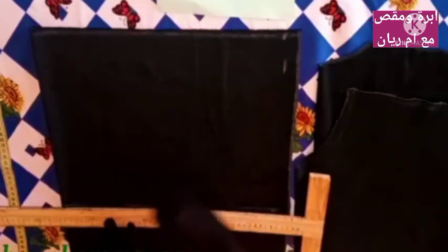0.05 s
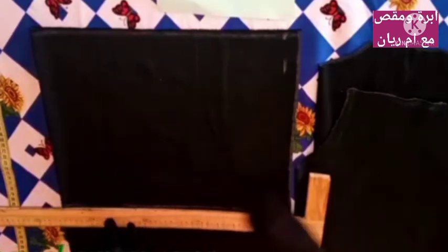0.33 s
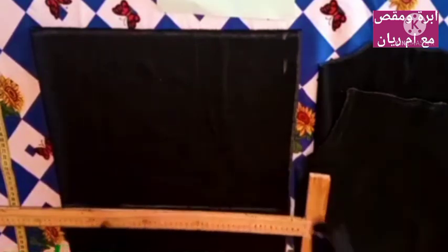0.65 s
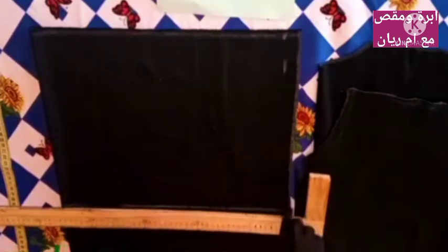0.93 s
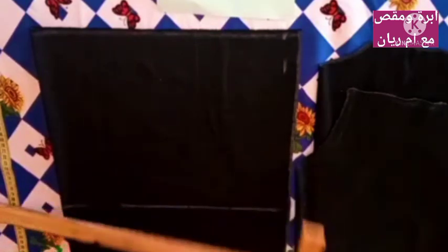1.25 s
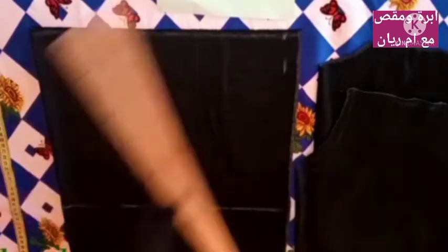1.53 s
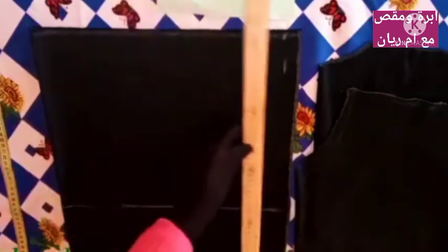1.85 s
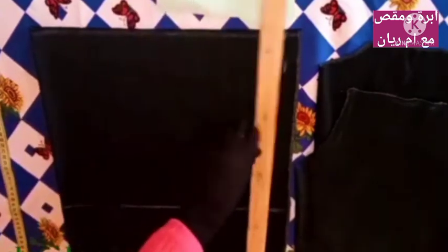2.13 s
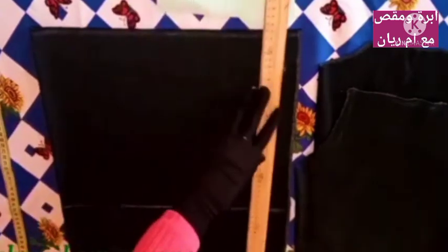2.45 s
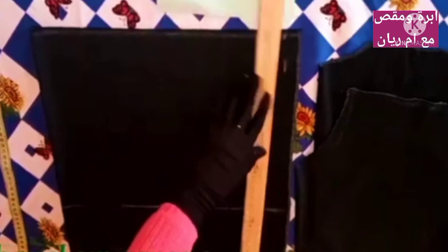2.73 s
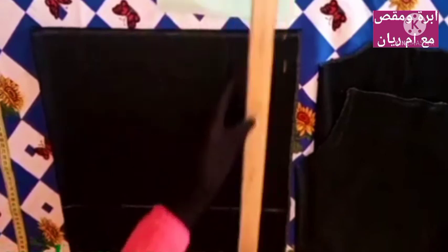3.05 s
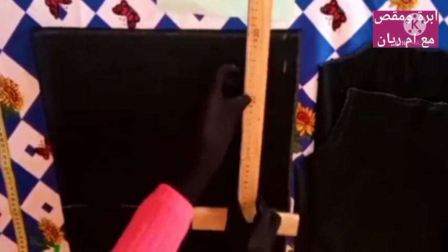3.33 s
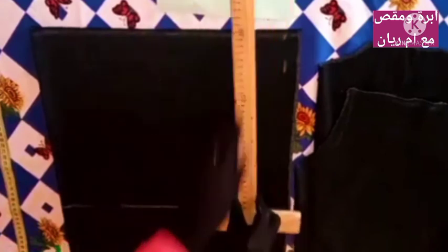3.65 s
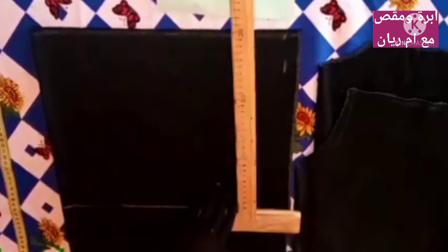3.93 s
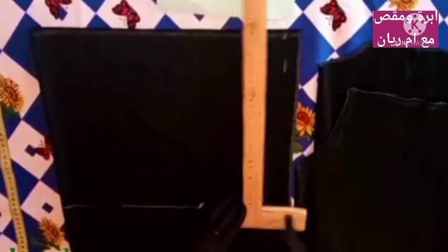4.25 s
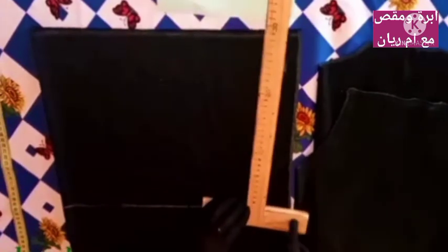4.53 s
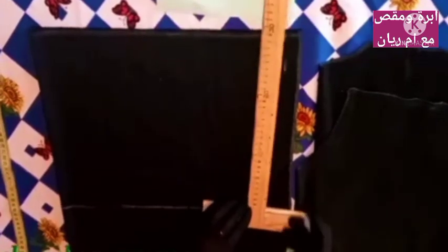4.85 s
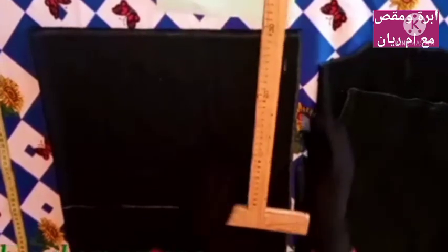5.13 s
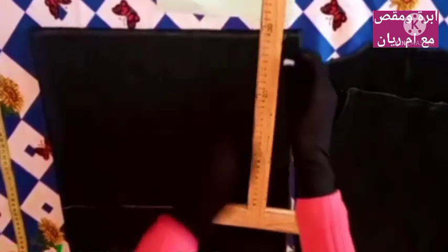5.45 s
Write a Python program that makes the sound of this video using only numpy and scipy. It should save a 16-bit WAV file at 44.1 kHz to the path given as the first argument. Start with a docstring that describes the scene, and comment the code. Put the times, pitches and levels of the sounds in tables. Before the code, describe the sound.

Chalk judders over cloth on a booming table, then a wooden square is turned, clacks down loudly and scrapes into place.

```python
"""First, tailor's chalk judders along a wooden square over cloth, and the table booms under it.
Then the square is lifted and turned, with soft bumps, swishes of cloth and a few wooden clacks.
At 3.7 s it is set down with the loudest clack; a limiter ducks the sound and slowly lets it back up.
Last, the square is pushed into place in four short, scraping strokes.
All along, a small hard room rings after the sounds and adds a faint rumble and hiss."""
import sys
import numpy as np
from scipy import signal
from scipy.fft import rfft, irfft
from scipy.io import wavfile
from scipy.ndimage import uniform_filter1d, minimum_filter1d

SR = 44100
rng = np.random.default_rng(int(sys.argv[2]) if len(sys.argv) > 2 else 0)


def master_out(mix):
    """Clip the mix to full scale and print it as 16-bit PCM to the path in sys.argv[1]."""
    frames = np.transpose(np.atleast_2d(mix))
    ceiling = np.clip(frames, -1, 1)
    pcm = np.round(ceiling * 32767).astype(np.int16)
    wavfile.write(sys.argv[1], SR, pcm)


N = 250776
TIME = np.arange(N) / SR
HZ = np.fft.rfftfreq(N, 1 / SR) + 1
FILTER_HZ = abs(np.fft.fftfreq(4096, 1 / SR)) + 1

# How long the room rings. Each row: frequency in Hz, seconds to fade by 60 dB.
ROOM_FADE = [(150, 0.36), (500, 0.65), (1000, 0.4), (2200, 0.44), (4000, 0.32), (7000, 0.27), (14000, 0.21)]
# First echoes off table and wall. Each row: delay in seconds, level in dB.
EARLY_ECHOES = [(.0011, -23.5), (.0026, -23), (.0043, -38.5), (.0068, -17.5), (0.0124, -17)]
# The tone of the room's rumble. Each row: frequency in Hz, relative level in dB.
RUMBLE_TONE = [(15, -59.5), (25, -41), (27, -33.5), (32, -18.5), (97, -0.5), (151, 7.5), (195, -10.5),
               (377, -13.5), (400, -30), (520, -66), (880, -120)]
# The tone of the steady hiss. Each row: frequency in Hz, relative level in dB.
HISS_TONE = [(120, -41), (200, -4.5), (725, -13), (1910, -11), (2160, -12), (2800, -12), (4120, -18.5),
             (7040, -20.5), (7840, -25.5), (8270, -23), (9710, -28), (13400, -27.5), (14400, -23)]
# Soft, dull low thumps during the handling and under the loudest clack.
# Each row: peak time in seconds, level in dB.
LOW_SWELLS = [(1.31, -39.5), (1.668, -45.5), (1.82, -46.5), (1.9, -49.5), (2.06, -49.5), (3.63, -51),
              (3.735, -37), (4.08, -53.5), (4.37, -36), (4.54, -45.5), (5.621, -45)]
# Glove and wood brush the cloth. Each row: fastest moment, time to speed up and time to slow down
# in seconds, relative level in dB, share of power above 7 kHz.
BRUSH_STROKES = [(.72, 0.045, .05, -53.5, 0.88), (0.761, .02, 0.022, -47.5, .1),
                 (.945, 0.29, 0.12, -55.5, 0.62), (1.128, 0.047, 0.032, -42.5, 0.62),
                 (1.3, 0.16, 0.093, -43, 0.37), (1.582, 0.028, 0.044, -54.5, 0.7),
                 (1.88, 0.25, 0.12, -56.5, 0.027), (2.135, 0.17, 0.041, -59, 0.25),
                 (2.29, 0.14, 0.094, -38.5, 0.38), (2.63, 0.088, 0.088, -50.5, 0.12),
                 (2.91, 0.065, 0.034, -34, 0.37), (3.041, 0.007, 0.085, -44.5, 0.78),
                 (3.096, 0.07, 0.028, -46.5, 0.42), (3.174, .035, 0.025, -48.5, 1),
                 (3.283, 0.028, 0.009, -42, 0.077), (3.712, 0.022, 0.026, -36.5, 0.21),
                 (4.12, 0.12, 0.13, -54.5, 0.62), (5.03, 0.096, 0.15, -51, 1),
                 (5.669, 0.024, 0.088, -46, 0.69)]
# The tone of brushed cloth. Each row: frequency in Hz, relative level in dB.
CLOTH_TONE = [(880, -56), (1500, -33), (2810, -17), (3030, -26.5), (3540, -3.5), (5450, -9), (6010, -1),
              (6680, -9), (7350, 1), (9450, -12.5), (11300, -3.5), (15000, -26)]
# Chalk or wood snags the weave. Each row: start and length in seconds, level in dB,
# centre and width of the noise band in Hz.
SNAGS = [(0.229, 0.25, -47, 4150, 260), (1.09, 0.094, -51, 2600, 2600), (1.186, 0.21, -54.5, 4080, 500),
         (2.534, 0.15, -59.5, 7950, 403), (2.888, .019, -33.5, 6040, 2220), (2.906, 0.012, -29, 5840, 2270),
         (2.956, .022, -50, 5950, 500), (3.068, 0.043, -41, 6000, 1900), (3.702, 0.021, -45, 2500, 1200),
         (4.463, 0.01, -35, 4220, 894), (4.568, 0.055, -27.5, 2840, 1280)]
# Wood bumps the covered table. Each row: start in seconds, noise level in dB, low and high edge in Hz,
# pitch of the strongest note in Hz, its level in dB.
BUMPS = [(0.563, -30.5, 324, 860, 580, -42), (0.943, -55, 200, 300, 226, -46),
         (1.124, -35.5, 272, 580, 323, -34), (2.148, -29.5, 278, 814, 341, -29),
         (2.153, -34, 55, 198, 95.5, -35), (2.194, -34, 70, 710, 89, -31.5),
         (3.287, -35.5, 297.6, 850, 1087, -31), (3.736, -14.5, 305, 1080, 323.5, -28.5),
         (4.342, -29.5, 120, 600, 350, -52)]
# The notes the square rings at. Each row: pitch in Hz, width in Hz before damping, relative level in dB.
SQUARE_NOTES = [(653, 94, -4), (728.8, 36, 2), (994.3, 42, 1.5), (1083, 27, -17.5), (1338, 32, 3),
                (1504, 45, -2.5), (1633, 87, -8), (1760, 78, -2), (1913, 60, -3.5), (2095, 52, -1),
                (2315, 61, -7), (2610, 13, -9.5), (2755, 30, -3), (3133, 68, -1.5), (3670, 61, -16.5),
                (3960, 40, -10), (4130, 180, -14.5), (4400, 110, -3.5), (4550, 300, -9.5), (5340, 55, -9),
                (5360, 35, -18), (5720, 240, -5), (6800, 76, -10.5), (7510, 80, -5)]
# The square slides. Each row: fastest moment, time to speed up and time to slow down in seconds,
# hiss level in dB, wood tone level in dB.
PUSH_STROKES = [(4.341, 0.074, 0.079, -27.5, -35.5), (4.6, 0.19, 0.06, -24, -26.5),
                (4.845, 0.034, 0.065, -35.5, -37), (5.562, .04, 0.087, -41.5, -53)]
# The tone of the sliding square. Each row: frequency in Hz, relative level in dB.
SCRAPE_TONE = [(240, -47), (400, -34), (718, -7.5), (834, -43), (983, -10), (1160, -41.5), (1350, -16),
               (1540, -5.5), (2610, 5), (2850, -3), (3570, 6.5), (5120, -1.5), (7010, 2.5), (14400, -15.5)]
# The square knocks. Each row: start in seconds, strength in dB, low and high edge in Hz, treble fall
# in dB per octave, wood ring in dB, damping by the hand as a factor, room level in dB.
CLACKS = [(2.1453, 3, 3460, 7300, 13, -10.5, 0.52, -8.5), (2.1897, -.5, 3460, 7460, 8, -8.5, 0.4, -5.5),
          (3.2272, -16, 6700, 7850, 7, -27, 1.5, -6), (3.2866, 8.5, 910, 1294, 5.5, 0.5, 1.1, -3),
          (3.735, 34, 1940, 2440, 12, 0.5, 1.07, -3), (3.7368, 25.5, 5400, 6200, 32, -8.5, 0.57, -22.5),
          (4.3338, 11.5, 830, 1610, 18.5, -3.5, 0.55, -0.5), (4.604, 5, 810, 1400, 24.5, -4, 0.13, -4.5),
          (4.835, -5, 754, 1370, 5.5, -3.5, 0.28, 1), (5.553, -10, 790, 1470, 27, 20, 0.13, -7)]
# The microphone's colouring of the clacks, with dips in the high treble.
# Each row: frequency in Hz, relative level in dB.
MIC_TONE = [(100, -13.5), (7500, 1), (9700, -6.5), (11500, -4), (13500, -21), (15000, -9.5)]
# The notes the table booms at. Each row: pitch in Hz, relative level in dB, seconds to fade by 60 dB.
TABLE_NOTES = [(57.6, -24, 0.49), (94.4, -39, 0.16), (145, -9, 0.078), (147.3, -5.5, 0.32),
               (164.7, -9, 0.37), (240, -0.5, 0.026), (285, -18.5, 0.39), (314.7, -10, 0.14),
               (410, -37, 0.36), (542, -14.5, 0.087), (744, -26, 0.42)]
# The tone of dragging chalk. Each row: frequency in Hz, relative level in dB.
CHALK_TONE = [(120, -36), (200, 7.5), (320, 1), (435, -4), (671, -9.5), (748, -6.5), (1170, -8), (2020, -9),
              (3870, -17), (7420, -16.5), (8500, -19.5), (9550, -30.5), (11500, -21.5), (12600, -35),
              (15000, -34)]
# The chalk catches and jumps. Each row: start in seconds, strength in dB.
CHALK_CATCHES = [(.010, -11.5), (.073, -13.5), (0.093, -17), (0.137, -8.5), (.184, -11.5), (.237, -10.5),
                 (.311, -12.5), (.379, -12), (.454, -11), (0.56, -13.5)]


def amp(db):
    """Turns decibels into a gain."""
    return 10 ** (np.asarray(db) / 20)


def unit(x):
    """Scales a sound to an average (rms) level of 1."""
    return x / np.sqrt(np.mean(x ** 2) + 1e-20)


def read(points, hz):
    """Reads between a table's rows, with frequency spaced in octaves."""
    f, value = np.transpose(points)
    return np.interp(np.log(hz + 1), np.log(f + 1), value)


def add(mix, s, sound):
    """Mixes a sound in at s seconds."""
    part = mix[max(round(s * SR), 0):][:len(sound)]
    part += sound[:len(part)]


def colour(x, gain):
    """Shapes the tone with a gain for each of HZ; the result has level 1."""
    return unit(irfft(rfft(x) * gain, N))


def causal(x, db):
    """Shapes the tone by dB given on FILTER_HZ, with no ringing ahead of a hit (minimum phase)."""
    log_gain = np.log(amp(db) + 1e-5)
    taps = np.fft.ifft(np.exp(np.conj(signal.hilbert(log_gain)))).real
    return signal.fftconvolve(x, taps[:len(taps) // 2])[:len(x)]


def band(x, low_hz, high_hz, fall_db, rise_db=15):
    """Keeps a band of frequencies; its sides rise and fall by the given dB per octave."""
    octaves_below = np.log2(1 + (low_hz / FILTER_HZ) ** 6) / 6
    octaves_above = np.log2(1 + (FILTER_HZ / high_hz) ** 4) / 4
    return causal(x, -rise_db * octaves_below - fall_db * octaves_above)


def waver(rate_hz, depth_db):
    """A gain that wanders at random."""
    return amp(depth_db * colour(rng.standard_normal(N), 1 / (1 + (HZ / rate_hz) ** 4)))


def stroke(peak_s, rise_s, fall_s, roundness=1.):
    """Gain of one swell: a tenth of its peak rise_s before and fall_s after it."""
    away = np.maximum((peak_s - TIME) / rise_s, (TIME - peak_s) / fall_s)
    return amp(-20 * np.minimum(abs(away), 10) ** roundness)


def held(db, recover_db_per_s):
    """Follows each peak at once and lets go at a steady rate."""
    fall = TIME * recover_db_per_s
    return np.maximum.accumulate(db + fall) - fall


def reflect(x):
    """Nearby surfaces repeat the sound within milliseconds, which colours it."""
    out = x.copy()
    for delay_s, db in EARLY_ECHOES:
        add(out, delay_s, amp(db) * x)
    return out / np.sqrt(1 + np.sum(amp(np.array(EARLY_ECHOES)[:, 1]) ** 2))


def room(x, build_s=0.0055):
    """Countless echoes build up quickly; each frequency dies away at its own speed."""
    hz, t, spectrum = signal.stft(rng.standard_normal(SR), SR, nperseg=256)
    fade = amp(-60 * t / read(ROOM_FADE, hz)[:, None])
    tail = signal.istft(spectrum * fade, SR, nperseg=256)[1]
    tail *= 1 - np.exp(-TIME[:len(tail)] / build_s)
    return signal.fftconvolve(x, tail / np.linalg.norm(tail))[:N]


def background(rumble_db=-58.5, hiss_db=-57):
    """An uneven low rumble and a faint hiss, with a soft, dull thump now and then."""
    swells = sum(amp(db) * stroke(s, rise_s=0.037, fall_s=0.14) for s, db in LOW_SWELLS)
    hum = unit(band(rng.standard_normal(N), low_hz=122, high_hz=170, fall_db=22, rise_db=22.5))
    drift = waver(rate_hz=7, depth_db=3.5)
    rumble = colour(rng.standard_normal(N), amp(read(RUMBLE_TONE, HZ)))
    hiss = colour(rng.standard_normal(N), amp(read(HISS_TONE, HZ)))
    return swells * hum + amp(rumble_db) * drift * rumble + amp(hiss_db) * hiss


def fibres(per_s, spread_db, smooth):
    """Friction: threads snap free in tiny slips of uneven size over a smooth rub."""
    slips = (rng.random(N) < per_s / SR) * rng.choice([-1, 1], N)
    sizes = amp(spread_db * np.minimum(rng.exponential(1, N), 4))
    return unit(unit(slips * sizes) + smooth * rng.standard_normal(N))


def wood(x, damping):
    """The square rings at its own notes; a hand on it damps them, so they die sooner."""
    t = TIME[:SR // 2]
    ring = np.zeros(len(t))
    for k, (hz, width, db) in enumerate(SQUARE_NOTES):
        fade = np.exp(-np.pi * width * damping * t)
        ring += (-1) ** k * amp(db) * width * fade * np.cos(2 * np.pi * hz * t)
    return signal.fftconvolve(x, ring / np.linalg.norm(ring))[:len(x)]


def brushes(level_db=-1.0, ring_db=1, room_db=-10):
    """Light strokes over the weave, coloured by the wood: a soft rub and a finer fizz."""
    slips = fibres(per_s=1800, spread_db=3, smooth=.6) * waver(rate_hz=80, depth_db=1.0)
    slips = reflect(slips + amp(ring_db) * wood(slips, damping=2.2))
    weave = amp(read(CLOTH_TONE, HZ))
    highs = 1 / (1 + (7000 / HZ) ** 8)
    rub, fizz = colour(slips, weave * (1 - highs)), colour(slips, weave * highs)
    out = np.zeros(N)
    for s, rise_s, fall_s, db, treble in BRUSH_STROKES:
        swish = np.sqrt(1 - treble) * rub + np.sqrt(treble) * fizz
        out += amp(db + level_db) * stroke(s, rise_s, fall_s, roundness=1.09) * swish
    return out + amp(room_db) * room(out)


def rasps(depth=0.14, room_db=-8):
    """Quick sticking and slipping makes a narrow band of rubbing noise flutter."""
    out = np.zeros(N)
    for s, length_s, db, centre_hz, width_hz in SNAGS:
        t = TIME[:round(length_s * SR)]
        band_db = -10 * np.log10(1 + (2 * (FILTER_HZ - centre_hz) / width_hz) ** 4)
        grit = causal(rng.standard_normal(len(t)), band_db)
        slip_hz = rng.uniform(48.3, 97.65)
        flutter = 1 + depth * np.cos(2 * np.pi * (slip_hz * t + rng.random()))
        add(out, s, amp(db) * unit(grit * flutter * signal.windows.tukey(len(t), .5)))
    return out + amp(room_db) * room(out)


def thuds(rise_s=0.0079, fade_s=0.42):
    """Cloth pads these blows, leaving one strong note in a dull rush of weaker ones."""
    out, t = np.zeros(N), TIME[:SR]
    for s, db, low_hz, high_hz, note_hz, note_db in BUMPS:
        rush = unit(band(reflect(rng.standard_normal(len(t))), low_hz, high_hz, fall_db=16))
        body = amp(db) * rush + amp(note_db) * np.sin(2 * np.pi * note_hz * t)
        add(out, s, body * amp(-60 * t / fade_s) * (1 - np.exp(-t / rise_s)))
    return out


def pushes(roundness=1.74, sing_s=0.18, ring_db=0.5, drone_db=-18, room_db=-9):
    """The sliding square hisses with speed and drones on the table; its low notes sing and linger."""
    speed, singing = np.zeros(N), np.zeros(N)
    for s, rise_s, fall_s, hiss_db, tone_db in PUSH_STROKES:
        speed += amp(hiss_db) * stroke(s, rise_s, fall_s, roundness)
        singing += amp(tone_db) * stroke(s, min(rise_s, sing_s), sing_s, roundness)
    slips = fibres(per_s=1600, spread_db=0.5, smooth=0.41) * waver(rate_hz=65, depth_db=2.0)
    rub = reflect(slips) + amp(ring_db) * wood(slips, damping=1.)
    drone = unit(band(slips, low_hz=180, high_hz=360, fall_db=14, rise_db=17))
    scrape = speed * (colour(rub, amp(read(SCRAPE_TONE, HZ))) + amp(drone_db) * drone)
    song = band(wood(slips, damping=0.44), low_hz=970, high_hz=1440, fall_db=15, rise_db=12.5)
    return scrape + singing * unit(song) + amp(room_db) * room(scrape)


def knocks(chatter=0.25, contact_cycles=5):
    """A sharp hit with a brief chatter rings the square and the room; duller hits chatter longer."""
    t, near, far = TIME[:SR // 2], np.zeros(N), np.zeros(N)
    for s, db, low_hz, high_hz, fall_db, ring_db, damping, room_db in CLACKS:
        force = chatter * rng.standard_normal(len(t)) * np.exp(-t * high_hz / contact_cycles)
        force[0] = 2  # the hit itself
        clack = band(force + amp(ring_db) * wood(force, damping), low_hz, high_hz, fall_db)
        clack = causal(clack, read(MIC_TONE, FILTER_HZ))
        clack *= amp(db) / np.linalg.norm(clack)
        add(near, s, clack)
        add(far, s, amp(room_db) * clack)
    return reflect(near) + room(far)


def chalk_stroke(attack_s=0.0083, ease_at_s=0.22, ease_db_per_s=15, lift_at_s=0.564, lift_db_per_s=189):
    """Gain of the chalk's drag: it starts quickly, eases off and dies as the chalk is lifted."""
    eased_db = ease_db_per_s * np.maximum(TIME - ease_at_s, 0)
    lifted_db = lift_db_per_s * np.maximum(TIME - lift_at_s, 0)
    return np.minimum(TIME / attack_s, 1) * amp(-eased_db - lifted_db) * waver(rate_hz=21, depth_db=1.5)


def chalk(rub_db=-27, scratch_db=-9.5, scratch_s=0.0071, bite_s=.28,
          rise_s=0.0024, tremble_db=-29, room_db=-8):
    """The chalk drags and catches; each catch scratches and sets the table booming."""
    t = TIME[:SR // 2]
    boom = sum(amp(db - 60 * t / fade_s) * np.sin(2 * np.pi * hz * t) for hz, db, fade_s in TABLE_NOTES)
    boom *= 1 - np.exp(-t / rise_s)  # the cloth softens the blow
    blows, catches = np.zeros(N), np.zeros(N)
    for s, db in CHALK_CATCHES:
        add(blows, s, amp(db) * boom)
        bite = min(s / bite_s, 1)  # scratches grow as the chalk bites into the cloth
        add(catches, s, amp(db + scratch_db) * bite * np.exp(-t / scratch_s))
    drag = chalk_stroke()
    slips = fibres(per_s=3200, spread_db=-0.5, smooth=0.92)
    rub = colour(reflect(slips), amp(read(CHALK_TONE, HZ)))
    scratch = catches * unit(band(rng.standard_normal(N), low_hz=300, high_hz=3080, fall_db=20))
    # the drag also keeps the table trembling between catches
    tremble = unit(signal.fftconvolve(rng.standard_normal(N), boom)[:N]) * drag
    table = band(blows + amp(tremble_db) * tremble, low_hz=48.6, high_hz=2960, fall_db=29)
    return table + amp(rub_db) * drag * rub + scratch + amp(room_db) * room(scratch)


def scene():
    """Everything on the table and the room around it, mixed to one channel."""
    return (chalk() + knocks() + thuds() + pushes() + brushes() + rasps() + background())[None]


def record(dry, ceiling_db=-1, quick_db_per_s=200, linger_db=7.0, slow_db_per_s=2.0, top_hz=15250):
    """A limiter turns peaks down and recovers fast, then slowly; the highest treble is cut off."""
    over_db = np.maximum(20 * np.log10(abs(dry[0]) + 1e-9) - ceiling_db, 0)
    quick_cut_db = held(over_db, quick_db_per_s)
    slow_cut_db = held(np.minimum(over_db, linger_db), slow_db_per_s)
    gain_db = -np.maximum(quick_cut_db, slow_cut_db)
    smooth_db = uniform_filter1d(minimum_filter1d(gain_db, size=41), size=41)
    low_pass = signal.firwin(511, top_hz, window=("kaiser", 9), fs=SR)
    return signal.oaconvolve(dry * amp(smooth_db), low_pass[None], "same")


dry = scene()
out = record(dry)
master_out(out)
```